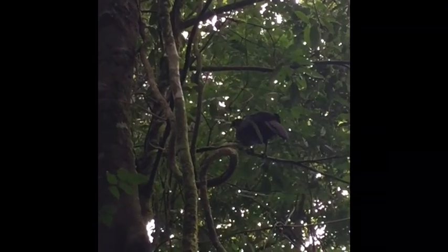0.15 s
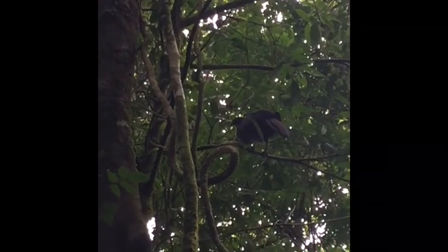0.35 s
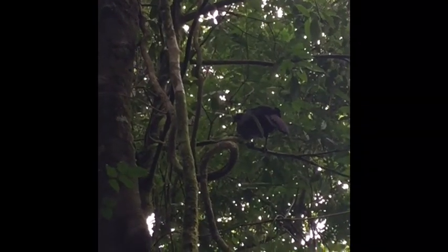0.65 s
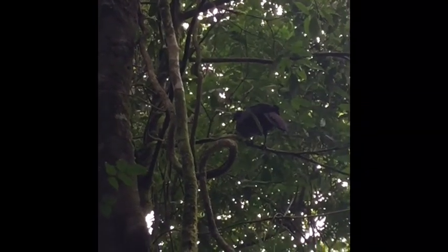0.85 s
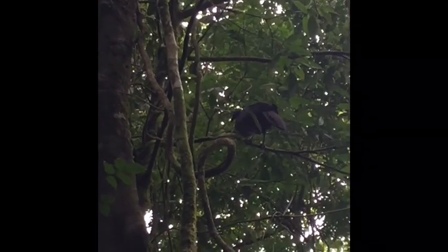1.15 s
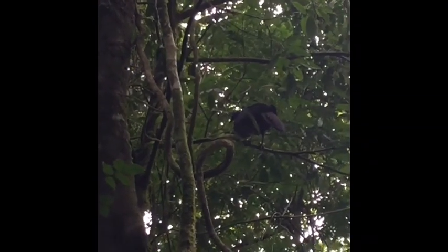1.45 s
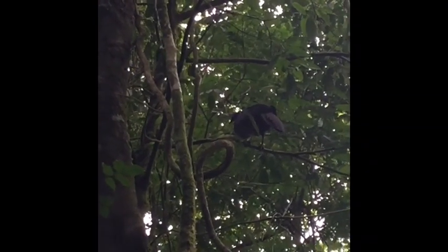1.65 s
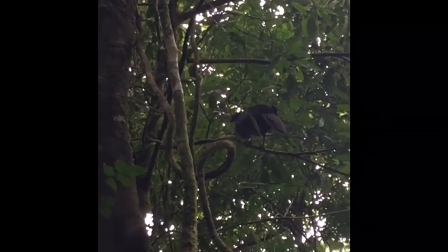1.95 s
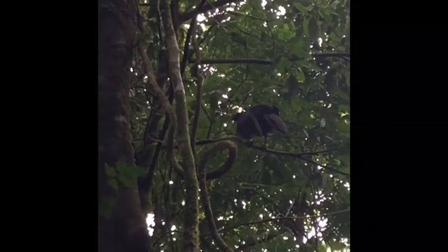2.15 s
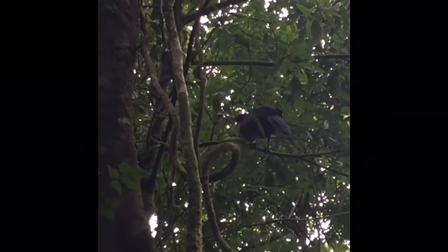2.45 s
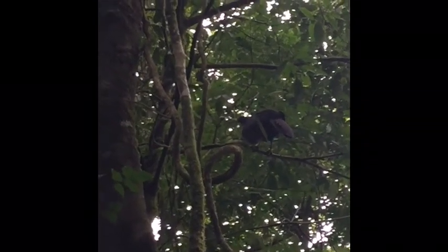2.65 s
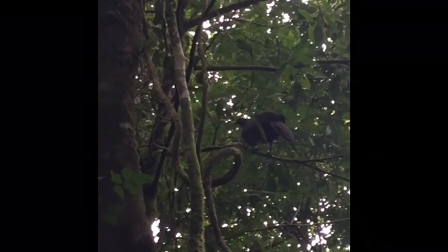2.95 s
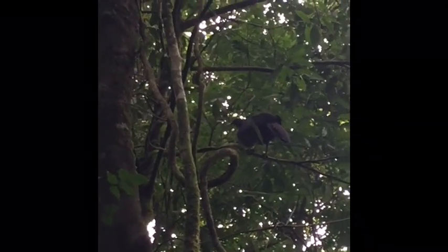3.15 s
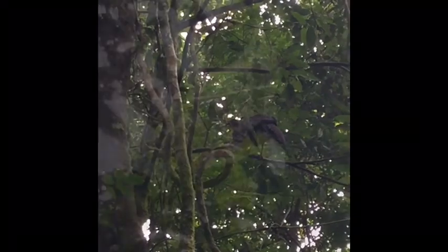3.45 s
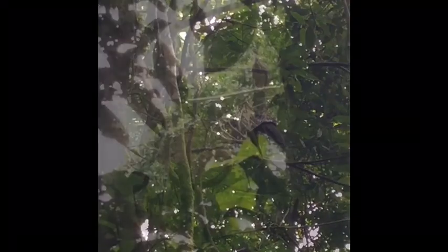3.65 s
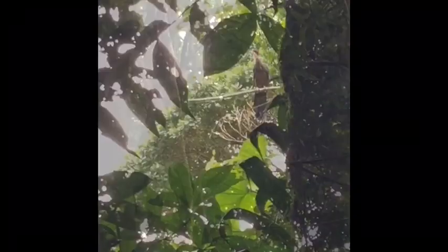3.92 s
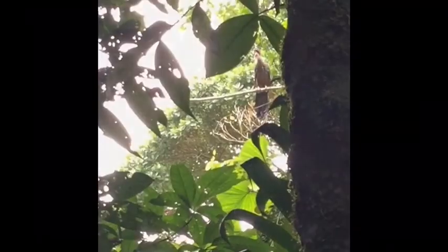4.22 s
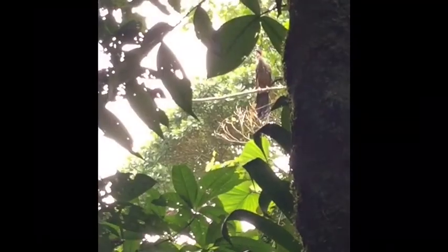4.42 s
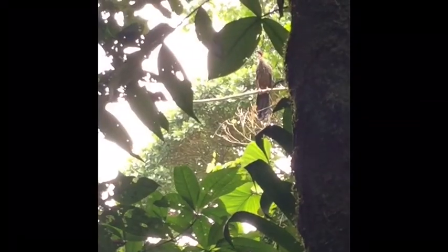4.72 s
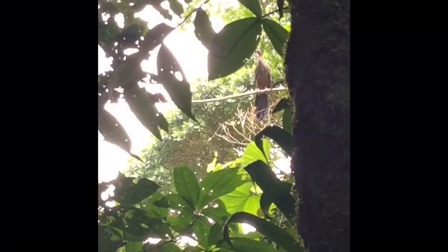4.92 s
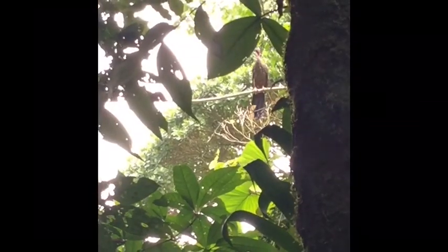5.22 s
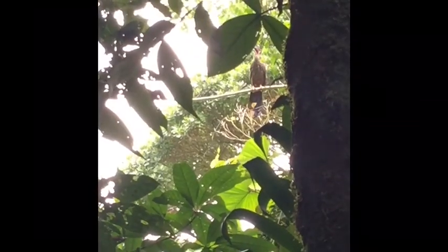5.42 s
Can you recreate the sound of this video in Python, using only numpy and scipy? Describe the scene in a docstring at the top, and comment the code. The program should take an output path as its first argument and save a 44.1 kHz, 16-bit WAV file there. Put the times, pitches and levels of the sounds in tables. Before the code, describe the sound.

A close cicada throbs and buzzes in repeated phrases over a swelling forest chorus, then fades behind a soft hush.

```python
"""Rainforest cicadas

A near cicada's tymbal clicks ring its abdomen in phrases: a throbbing rise, then a clear, slowly sinking buzz.
A chorus answers in waves; trunks and leaves scatter the song. Something rustles low in the leaves. From 3.4 s
the scene crossfades to a clearing: the near singer fades, the air grows louder and far birds whistle."""
import sys
import numpy as np
from scipy import signal
from scipy.fft import rfft, irfft, next_fast_len
from scipy.io import wavfile
from scipy.ndimage import uniform_filter1d

SR = 44100
rng = np.random.default_rng(int(sys.argv[2]) if len(sys.argv) > 2 else 0)


def unload_audio(sound):
    """Save the sound as a 16-bit wav file, at the path given as the first command line argument."""
    columns = np.transpose(np.atleast_2d(sound))
    # keep every value between -1 and 1, then stretch to whole-number steps
    steps = np.round(np.clip(columns, -1, 1) * 32767)
    wavfile.write(sys.argv[1], SR, steps.astype(np.int16))


N = 246059
T = np.arange(N) / SR
OPENING_S = (3.36, 4.24)  # the canopy scene crossfades into the clearing scene

# upper band of a slack abdomen: (frequency [Hz], level [dB])
SLACK_SHRILL = [(4060, -39), (6900, -7), (7270, -14.5), (8750, -12.5), (10700, -22), (12200, -8.5),
                (13300, 3.5), (13700, 1), (15900, -10)]


def undb(db):
    """Decibels to gain."""
    return 10 ** (np.asarray(db) / 20)


def unit(x):
    """Scale to rms 1."""
    return x / np.sqrt(np.mean(x ** 2) + 1e-20)


def ramp(begin_s, end_s):
    """Linear rise from 0 to 1."""
    return np.clip((T - begin_s) / (end_s - begin_s), 0, 1)


def walk(rate_hz):
    """Smooth random drift, spread near 1."""
    step = max(int(SR / rate_hz), 2)
    held = np.repeat(rng.standard_normal(N // step + 2), step)
    return 1.25 * uniform_filter1d(held, step)[step // 2:step // 2 + N]


def colour(x, points, size=4096):
    """Minimum-phase filter through (frequency [Hz], level [dB]) points; output rms 1."""
    hz, db = np.transpose(points)
    f = np.maximum(np.fft.rfftfreq(size, 1 / SR), 1)
    octaves_outside = np.maximum(np.log2(hz[0] / f), 0) + np.maximum(np.log2(f / hz[-1]), 0)
    shape_db = np.interp(np.log(f), np.log(hz), db) - np.minimum(60 * octaves_outside, 40)
    cepstrum = irfft(np.log(undb(shape_db)))
    cepstrum[1:size // 2] *= 2
    cepstrum[size // 2 + 1:] = 0
    impulse = irfft(np.exp(rfft(cepstrum)))
    return unit(signal.fftconvolve(x, impulse)[:N])


def resonate(x, hz, width_hz):
    """One resonance applied twice for steep skirts; output rms 1."""
    b, a = signal.iirpeak(hz, hz / width_hz, fs=SR)
    return unit(signal.lfilter(b, a, signal.lfilter(b, a, x)))


def forest(x, wet_db, t60_s):
    """Direct sound plus a tail scattered by trunks and leaves; output rms 1."""
    tail = rng.standard_normal(SR) * np.exp(-np.log(1000) * T[:SR] / t60_s)
    primed = np.concatenate([x[-SR:], x])  # already ringing at the start
    scattered = signal.fftconvolve(primed, tail / np.linalg.norm(tail))[SR:SR + N]
    return unit(x + undb(wet_db) * scattered)


def phrasing():
    """Near cicada's gain, stroke rate, flutter (0-1), effort (0-1) and second-tymbal lag."""
    # phrases: (start [s], turns clear [s], stop [s], rise level [dB], buzz level [dB], lag [cycles])
    phrases = [(-1.1, -0.55, 0.21, -31, -25.5, .46), (0.91, 1.47, 2.21, -31.4, -23.8, .46),
               (2.87, 3.39, 4.07, -30.7, -24.4, .485)]
    attack_s, swell_s, ease_s, ease_db, release_db_per_s = .14, .13, .27, 6.6, 112
    start_hz, rush_hz, clear_hz, hold_s, sag_hz_per_s = 131, 136, 132.5, .1, 11.6
    settle_s, unsettle_s, flutter_floor = .05, .37, .06
    rows = np.array(phrases)
    start, clear, stop, rise_db, buzz_db, lag_cycles = rows[np.searchsorted(rows[1:, 0], T)].T
    effort, settled = ramp(start, clear), ramp(clear - settle_s, clear)
    db = rise_db + (buzz_db - rise_db) * ramp(start + attack_s, clear + swell_s) ** 1.4
    db = db - ease_db * ramp(stop - ease_s, stop) - release_db_per_s * np.maximum(T - stop, 0)
    rising_hz = start_hz + (rush_hz - start_hz) * effort
    sinking_hz = clear_hz * (1 + .0012 * walk(14)) - sag_hz_per_s * np.maximum(T - clear - hold_s, 0)
    hz = (1 - settled) * rising_hz + settled * sinking_hz
    flutter = np.clip(1 - settled + flutter_floor + ramp(stop - unsettle_s, stop), 0, 1)
    return ramp(start, start + attack_s) * undb(db), hz, flutter, effort, lag_cycles


def throb(rate_hz, unevenness):
    """The abdomen pumps in and out, not quite in time."""
    cycles = np.cumsum(rate_hz * (1 + unevenness * walk(8))) / SR
    return np.sin(2 * np.pi * (cycles + rng.random()))


def tymbals(hz, jitter_s, scatter_db, second_db, lag_cycles):
    """Two drums buckle in turn; each click varies in timing and strength."""
    cycles = np.cumsum(hz) / SR + rng.random()
    stroke = np.arange(2, int(2 * cycles[-1]))
    second = stroke % 2
    lag = np.interp(stroke // 2, cycles, lag_cycles * np.ones(N))
    chance = rng.standard_normal((N // 100, 2))[:len(stroke)]
    at_samples = SR * (np.interp(stroke // 2 + second * lag, cycles, T) + jitter_s * chance[:, 0])
    strength = undb(scatter_db * chance[:, 1] + second_db * second)
    taps = at_samples.astype(int)[:, None] + np.arange(-7, 9)
    offset = taps - at_samples[:, None]
    clicks = strength[:, None] * np.sinc(offset) * np.sinc(offset / 8)  # band-limited impulses
    return np.bincount(np.clip(taps, 0, N - 1).ravel(), clicks.ravel(), N)


def ribs(clicks, spread_s, across_hz):
    """Tymbal ribs buckle in sequence, each at its own pitch, drawing a click into a chirp."""
    size = next_fast_len(N)
    f = np.fft.rfftfreq(size, 1 / SR)
    dispersion = np.exp(1j * np.pi * f ** 2 * spread_s / across_hz)
    return irfft(rfft(clicks, size) * dispersion, size)[:N]


def abdomen(clicks, stretch, slack, taut):
    """Stretching blends slack resonances into taut; slow level evened out, throb kept."""
    ring = (1 - stretch) * colour(clicks, slack) + stretch * colour(clicks, taut)
    return ring / np.sqrt(uniform_filter1d(ring ** 2, SR // 6) + 1e-12)


def near_cicada():
    """Clicks ring the abdomen, shriller as it stretches; its pumping shakes pace and level."""
    # abdomen's main band, slack and taut, and upper band, taut: (frequency [Hz], level [dB])
    slack_body = [(2100, -43.5), (2450, -18), (2650, -17.5), (2900, -6.5), (3330, -10.5), (3610, 4.5),
                  (3860, -14.5), (4150, 0), (4420, 2), (4800, -2), (5130, -9.5), (5700, -9.5), (6430, -28),
                  (7200, -47.5)]
    taut_body = [(2000, -40.5), (2500, -20.5), (2850, -43), (3170, -1.5), (3350, -8.5), (3640, -0.5),
                 (4000, -7.5), (4350, 0.5), (4820, -1), (5150, -2.5), (5500, -5.5), (6100, -18.5),
                 (6700, -26), (7400, -36)]
    taut_shrill = [(4060, -35.5), (6900, -21.5), (7250, -13.5), (8690, -14), (11000, -20), (11700, -18.5),
                   (12200, -3.5), (13300, -4), (13900, 2.5), (15100, 4.5), (15900, -13)]
    slack_shrill_db, taut_shrill_db, clearing_db = -18.5, -9.6, -13
    gain, hz, flutter, effort, lag_cycles = phrasing()
    pump = throb(rate_hz=22, unevenness=.16)
    hz = hz * (1 + flutter * (.0076 * pump + .014 * walk(70)))
    clicks = tymbals(hz, jitter_s=.000011, scatter_db=1.4, second_db=-4, lag_cycles=lag_cycles)
    clicks = clicks * undb(flutter * (3.5 * pump + 1.35 * walk(16)))
    chirps = forest(ribs(clicks, spread_s=.0023, across_hz=3018), wet_db=3.5, t60_s=.3)
    stretch = .86 * effort ** 2.1
    body = abdomen(chirps, stretch, slack_body, taut_body)
    shrill = abdomen(chirps, stretch, SLACK_SHRILL, taut_shrill)
    shrill_db = slack_shrill_db + (taut_shrill_db - slack_shrill_db) * np.sqrt(effort)
    return gain * undb(clearing_db * ramp(*OPENING_S)) * (body + undb(shrill_db) * shrill)


def chorus(count=6):
    """Farther cicadas, each at its own pace, blurred by trees; shriller when loud and close."""
    # overlapping waves of song: (start [s], rise [s], stop [s], level [dB], fade [dB/s])
    waves = [(-1.0, .9, 0.54, -35.8, 36), (0.85, .27, 1.3, -33, 25), (1.65, .5, 2.52, -32.6, 21),
             (2.8, .27, 3.2, -35, 32), (3.3, .5, 4.15, -42.6, 14), (5.08, .42, 5.6, -41.8, 20)]
    # radiated main band: (frequency [Hz], level [dB])
    main_band = [(1240, -56.5), (2100, -32), (2550, -21.5), (2770, -12), (2980, -5), (3290, -3.5),
                 (3590, -3), (3980, -2.5), (4390, 1), (5390, -8), (5980, -9), (6660, -27.5), (7200, -85.5),
                 (9360, -50), (15800, -120)]
    # far singers on one note: (frequency [Hz], width [Hz], level re main band [dB])
    held_notes = [(3690, 70, -11), (3500, 55, -17.5), (3043, 140, -17.5)]
    gain = np.sqrt(sum((ramp(start, start + rise) * undb(db - fade * np.maximum(T - stop, 0))) ** 2
                       for start, rise, stop, db, fade in waves))
    clicks = 0
    for pace_hz in rng.uniform(115, 145, count):
        pump = throb(rate_hz=21, unevenness=.25)
        hz = pace_hz * (1 + .012 * walk(4) + .01486 * pump)
        singer = tymbals(hz, jitter_s=.00008, scatter_db=1.5, second_db=1, lag_cycles=.47)
        clicks = clicks + singer * undb(6 * pump)
    blurred = forest(clicks, wet_db=2.5, t60_s=.79) * undb(1.1 * throb(rate_hz=11, unevenness=.39))
    held = sum(undb(db) * resonate(rng.standard_normal(N), hz, width) for hz, width, db in held_notes)
    body = unit(colour(blurred, main_band) + held)
    shrill_gain = undb(-16.3 - 8 * ramp(*OPENING_S)) * (gain / gain.max()) ** .3
    return gain * (body + shrill_gain * colour(blurred, SLACK_SHRILL))


def air():
    """Hush of distant leaves and water, louder and brighter in the clearing."""
    # hush under the canopy and by the clearing: (frequency [Hz], level [dB])
    canopy_shape = [(18, -70), (30, -55), (64, -28), (112, -19.5), (138, -13.5), (165, -5.5), (191, -2),
                    (282, -1.5), (472, -9.5), (616, -10), (1010, -13.5), (1990, -16.5), (2100, -28.5),
                    (2730, -52), (4620, -120)]
    clearing_shape = [(18, -73), (30, -40), (64, -43), (127, -5.5), (209, 0), (838, -10), (1120, -8.5),
                      (2390, -9.5), (2800, -8), (5120, -16), (5680, -18), (6150, -15), (6830, -19.5),
                      (10900, -27), (15800, -53)]
    opening = ramp(*OPENING_S)
    canopy = colour(rng.standard_normal(N), canopy_shape) * undb(-58.5 + .49 * walk(4.1))
    clearing = colour(rng.standard_normal(N), clearing_shape) * undb(-49.4 + 1.2 * walk(5.1))
    return np.sqrt(1 - opening ** 2) * canopy + opening * clearing


def brush(start_s, length_s, hz, width_hz, grain_db=1.5):
    """Leaves or twigs rub: a short, grainy swell in one broad resonance."""
    age = np.maximum(T - start_s, 0) / length_s
    swell = (np.e * 3 * age * np.exp(-3 * age)) ** 2
    friction = rng.standard_normal(N) * undb(grain_db * walk(500))
    return swell * resonate(friction, hz, width_hz)


def rustles(stir_count=3, stir_db=-55):
    """Distinct rustles, each a low body with a brighter edge, among faint random stirrings."""
    # rustles, soft knocks, a twig's tick:
    # (time [s], length [s], level [dB], centre [Hz], width [Hz], edge re body [dB])
    events = [(0.21, 0.09, -55, 290, 170, -14), (1.502, 0.006, -37, 1700, 900, -7),
              (1.57, 0.022, -49, 240, 110, -16), (1.668, 0.013, -49, 420, 300, -12),
              (1.859, 0.025, -54, 450, 600, -7), (1.942, 0.081, -55.5, 650, 1100, -7),
              (2.009, 0.055, -45.6, 620, 400, -2.5), (2.229, 0.049, -45.4, 330, 300, -4),
              (2.563, 0.14, -57, 600, 900, -10), (2.755, 0.035, -57, 400, 600, -12),
              (3.442, 0.019, -47, 333, 400, -10)]
    out = sum(undb(stir_db) * brush(start_s, length_s=.025, hz=290, width_hz=190)
              for start_s in rng.uniform(0, OPENING_S[0], stir_count))
    for start_s, length_s, db, hz, width_hz, edge_db in events:
        edge = brush(start_s, length_s, 2.6 * hz, 3.5 * width_hz)
        body = brush(start_s, length_s, hz, width_hz)
        out = out + undb(db) * (body + undb(edge_db) * edge)
    return out


def birds():
    """Far birds: thin falling whistles, smeared by the forest."""
    # whistles: (time [s], length [s], start pitch [Hz], end pitch [Hz], level [dB])
    whistles = [(3.68, 0.13, 1805, 1330, -61), (4.378, .068, 1370, 1250, -49.5),
                (4.449, 0.048, 1260, 1160, -58), (4.921, 0.15, 5580, 5520, -58.5)]
    song = np.zeros(N)
    for start_s, length_s, start_hz, end_hz, db in whistles:
        age = np.clip((T - start_s) / length_s, 0, 1)
        hz = start_hz + (end_hz - start_hz) * age
        envelope = undb(db) * np.sqrt(2) * np.sin(np.pi * age)
        song += envelope * np.sin(2 * np.pi * np.cumsum(hz) / SR)
    return np.std(song) * forest(song, wet_db=-3, t60_s=.5)


def scene():
    """Mono mix at the forest floor."""
    return (near_cicada() + chorus() + air() + rustles() + birds())[None]


def record(dry, bass_hz=55, top_hz=15850):
    """Thin the deep bass; cut the top steeply."""
    thin = signal.sosfilt(signal.butter(2, bass_hz, "highpass", fs=SR, output="sos"), dry)
    return signal.sosfilt(signal.ellip(12, .2, 80, top_hz, fs=SR, output="sos"), thin)


dry = scene()
out = record(dry)
unload_audio(out)
```